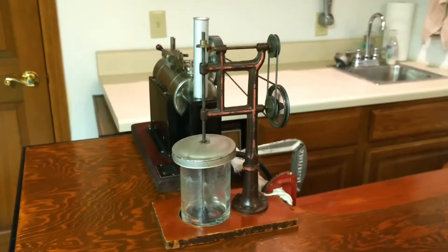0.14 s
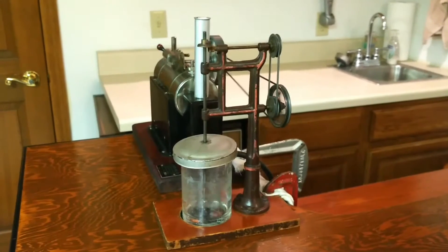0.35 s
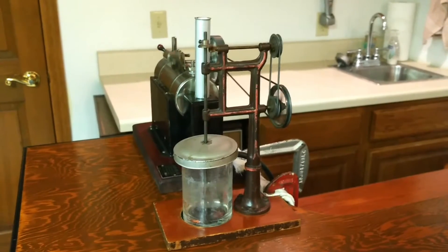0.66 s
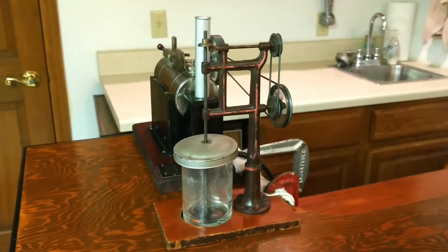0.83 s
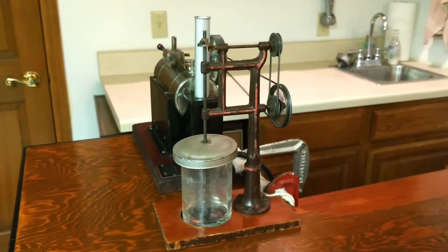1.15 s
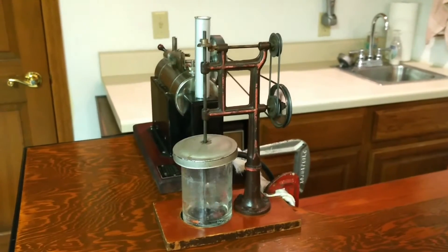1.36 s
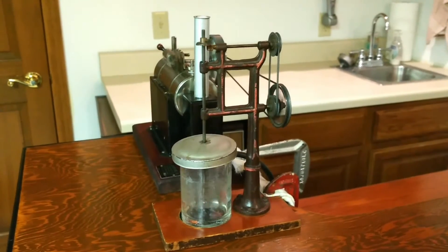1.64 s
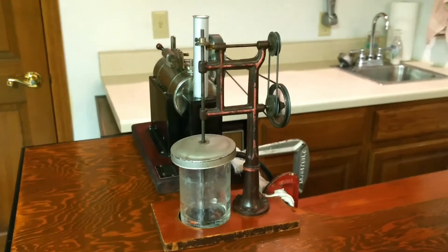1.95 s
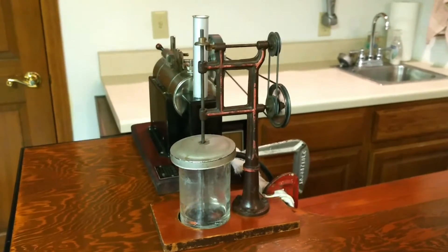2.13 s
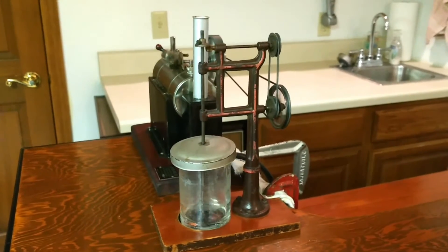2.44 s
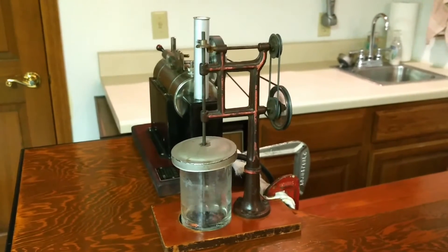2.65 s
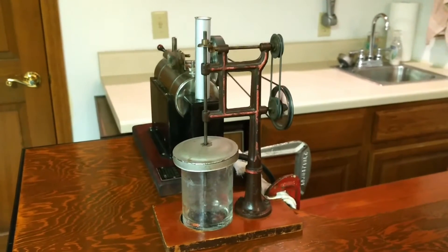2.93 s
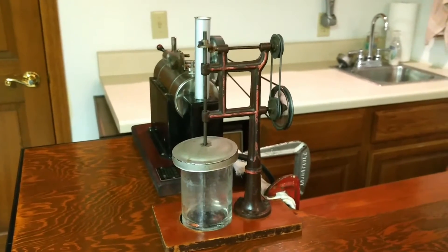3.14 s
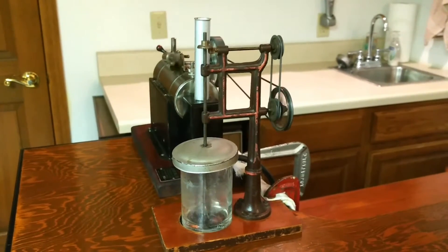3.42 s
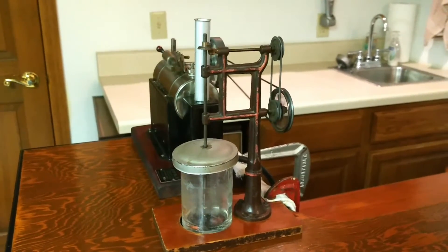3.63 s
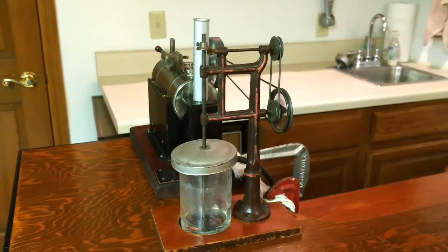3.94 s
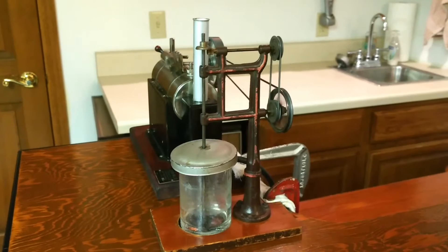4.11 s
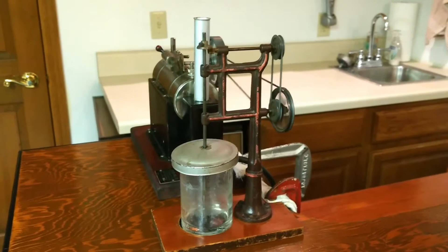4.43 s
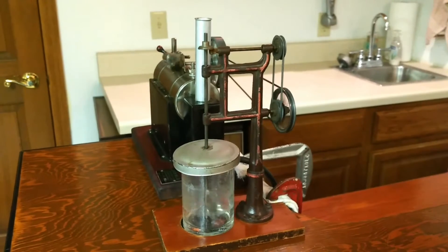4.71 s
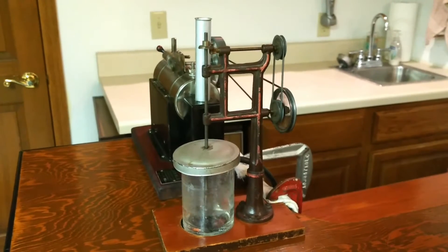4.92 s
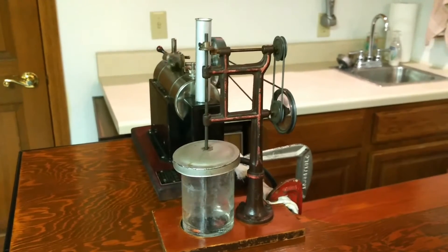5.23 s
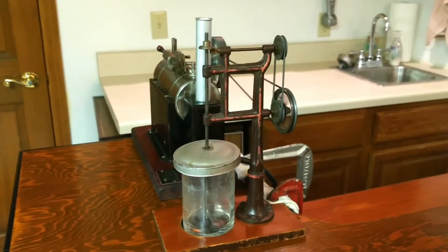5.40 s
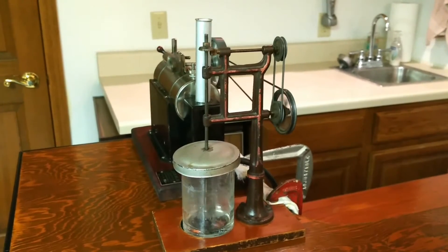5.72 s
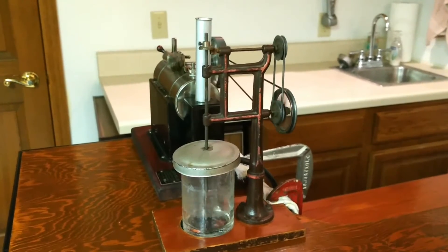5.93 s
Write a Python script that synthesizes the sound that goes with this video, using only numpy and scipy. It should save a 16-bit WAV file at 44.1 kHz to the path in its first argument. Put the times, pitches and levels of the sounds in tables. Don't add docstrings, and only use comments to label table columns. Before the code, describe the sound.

A toy steam engine drives a small churn with a fast, even double-knock clatter, soft rhythmic steam hiss and irregular glassy rattles in a kitchen.

```python
import sys
import numpy as np
from scipy import signal
from scipy.fft import rfft, irfft, next_fast_len
from scipy.io import wavfile
from scipy.ndimage import uniform_filter1d

SR = 44100
rng = np.random.default_rng(int(sys.argv[2]) if len(sys.argv) > 2 else 0)


def linear_from_db(decibels):
    return 10 ** (np.asarray(decibels, float) / 20)


def to_wav(sig):
    pcm = np.clip(np.atleast_2d(sig), -1, 1) * 32767
    pcm = np.round(pcm).astype(np.int16)
    wavfile.write(sys.argv[1], SR, pcm.T)


N = 267246
LOST_S, LOST = 4.678, 1024
LONG = N + LOST
MS = SR / 1000

# start in seconds, level in dB.
EARLY_KNOCKS = [(0.016, -29.9), (0.0934, -25.6), (0.1714, -25.0), (0.2499, -23.9), (0.3283, -27.6),
                (0.4066, -26.1), (0.4857, -30.2), (0.5636, -25.9), (0.642, -26.8), (0.7211, -30.5),
                (0.7997, -31.6), (0.8777, -25.4), (0.9564, -27.2), (1.0348, -26.3), (1.113, -26.1),
                (1.1922, -27.8), (1.272, -29.3), (1.3498, -26.3), (1.429, -31.0), (1.5079, -27.0),
                (1.5866, -27.1), (1.6656, -28.8), (1.7446, -27.1), (1.8232, -27.7), (1.9033, -28.0),
                (1.9828, -29.6), (2.0619, -28.9), (2.1413, -27.5), (2.2209, -27.5), (2.3007, -26.4),
                (2.3806, -27.3), (2.4609, -27.8), (2.5414, -26.1), (2.6207, -26.6), (2.701, -24.7),
                (2.7813, -27.3), (2.8616, -28.3), (2.9431, -26.3)]
LATE_KNOCKS = [(3.0233, -27.1), (3.1036, -27.5), (3.1845, -26.3), (3.2656, -26.7), (3.3452, -25.8),
               (3.4256, -26.1), (3.5062, -27.2), (3.5868, -26.5), (3.6666, -26.8), (3.7476, -29.2),
               (3.8277, -27.2), (3.9084, -29.4), (3.9889, -29.2), (4.07, -31.6), (4.1505, -28.4),
               (4.2319, -26.6), (4.3122, -25.9), (4.3926, -26.8), (4.4738, -26.0), (4.5554, -25.0),
               (4.6356, -25.0), (4.6932, -26.3), (4.7748, -24.8), (4.8554, -26.3), (4.9366, -25.1),
               (5.0182, -25.7), (5.0991, -29.6), (5.1804, -25.7), (5.2617, -26.3), (5.343, -26.6),
               (5.4242, -27.3), (5.5062, -25.7), (5.5876, -25.3), (5.6676, -28.0), (5.7494, -27.6),
               (5.8317, -25.5), (5.9118, -26.2), (5.9939, -26.0)]
# start in seconds, level in dB.
RATTLES = [(.031, -27), (.383, -29), (.395, -35), (0.547, -22.5), (0.758, -22), (0.767, -29), (.777, -20),
           (.826, -23), (1.207, -26), (1.2136, -23), (1.222, -24), (1.575, -29), (2.032, -22), (2.237, -25),
           (2.2452, -23), (2.269, -26), (2.6913, -26), (3.1379, -22), (3.147, -23), (3.232, -24),
           (3.3709, -17), (3.394, -25), (3.817, -25), (3.973, -27), (4.034, -28), (4.045, -20),
           (4.053, -26), (4.122, -33.5), (4.134, -21), (4.212, -28), (4.218, -24), (4.4452, -29),
           (4.5095, -21.5), (4.524, -29), (4.573, -24), (4.592, -23), (4.658, -27), (4.7171, -25.5),
           (4.7992, -24), (4.8758, -25), (5.161, -24), (5.173, -31), (5.254, -24), (5.621, -25),
           (5.783, -27), (5.802, -21), (5.868, -23), (5.875, -24), (6.014, -21), (6.0246, -25)]
# start in seconds, level in dB, pitch in Hz.
SQUEAKS = [
    (1.8656, -47, 5880),
    (3.5418, -54, 5700),
    (3.8222, -41.5, 5900),
    (3.908, -42.5, 8000),
    (4.0594, -46, 7990),
    (4.1325, -43, 5900),
    (4.2832, -42, 5770),
    (4.6654, -48, 5710),
    (5.5364, -48, 8000),
]

# pitch in Hz, level in dB, seconds to fall by 60 dB.
CRANK_RING = [(370, -10, .12), (570, -14, .04), (638, -2, .055), (742, -4, .045), (880, -10, .03),
              (1048, -6, .045), (1110, -8, .035), (1190, -5, .05), (1332, -6.5, .06), (1550, -13, .03),
              (1890, -22, .04), (2940, -24, .04)]
RETURN_RING = [(430, -14, .05), (590, -13, .035), (640, 0, .055), (745, -7, .045), (1050, -13, .04),
               (1332, -15, .05), (1640, -14, .04)]
VALVE_RING = [(1600, -5, .035), (1893, -1, .045), (2003, -4, .04)]
LINKAGE_RING = [(2440, -38, 0.0094), (2955, 28, 0.0069), (3260, -23, 0.019), (3670, -34, 0.11),
                (3910, 3.5, 0.051)]
JAR_RING = [(215.3, -7, 0.17), (271.5, 0, 0.083), (325, 2.5, 0.02), (371, -3.5, 0.15), (448, 12.5, 0.019),
            (568, -39, 0.041), (540, -29, 0.059), (685, 14, 0.025), (734, -6, 0.012), (1060, -21, 0.029),
            (1416, 17, 0.028), (2870, -31, 0.016)]
TABLE_RING = [(177, -34, 0.039), (165.5, -3, 0.23), (189, 13, 0.17), (217.7, 11.5, 0.075)]

# multiple of the shaft speed, level in dB.
ORDERS_DB = [(5, -49), (9, -48), (10, -54), (12, -55.5), (14, -52.5), (17, -62.5), (29, -56), (30, -56.5)]
# time in seconds, level change in dB.
NINTH_DRIFT = [
    (0, 2.5),
    (1.2, 1.5),
    (2.6, -2.5),
    (6.1, -2.5),
]
# frequency in Hz, level in dB per Hz.
RUMBLE = [(30, -0.5), (60, 9), (95, -54), (112, -47), (135, -9), (170, 7.5), (260, -20), (370, -5.5),
          (640, -6.5), (1000, -10), (1600, -26.5), (2200, -8.5), (3000, -21.5), (5000, -51.5)]
# pitch in Hz, width in Hz, level in dB.
STRANDS = [(167, 14, -51), (205, 14, -54), (371, 20, -55), (638, 36, -55), (740, 40, -57), (1190, 50, -64),
           (1550, 80, -66)]

# frequency in Hz, level in dB per Hz.
PUFF_COLOR = [(300, -60), (1500, -13), (3000, -0.5), (4000, -13), (6000, -8.5), (9000, -7.5), (11500, -5.5),
              (13500, -3.5), (15300, 4.5)]
# frequency in Hz, level in dB per Hz.
LEAK_COLOR = [(300, -9.5), (1500, 3.5), (3000, -4.5), (4500, -6), (7000, -7.5), (10000, -9), (12500, -10.5),
              (15300, 5)]
# time in seconds, level in dB.
PRESSURE = [
    (0, -46),
    (1.4, -48.5),
    (2.3, -46.5),
    (4.4, -47),
    (6.1, -46),
]

# time in seconds, lean from return knock (0) to chatter (1),
# valve contact from 0 to 1.
SLACK = [(0, 0.3, 0.8), (.7, 0.45, 0.77), (.95, 0.04, 0.73), (1.11, 0.7, 0.2), (1.2, 0.25, 0.87),
         (1.7, 0.46, 0.83), (2.0, 0.5, 0.78), (2.3, 0.22, 0.72), (2.55, 0.5, 0.4), (3.05, 0.8, 0.4),
         (3.3, 0.56, 0.45), (3.5, .15, 0.4), (3.67, 0.57, 0.45), (3.85, 0.28, 0.78), (4.07, 0.37, 0.76),
         (4.2, 0.69, 0.26), (5.0, 0.64, 0.1), (6.1, 0.75, 0.2)]
# delay after the knock in ms, level in dB.
REBOUNDS = [
    (6.35, -8),
    (13.1, -14),
]
# delay after the knock in ms, level in dB.
TICKS = [
    (40.5, 3),
    (46.0, 5.5),
    (52.5, -19),
]
# delay after the knock in ms, level in dB.
CHATTER = [(39.5, 3), (41.7, 7.5), (43.6, 6.5), (50.0, 4), (54, -5)]
# delay after the knock in ms, level in dB.
CLACKS = [
    (-0.5, -44),
    (0, -44.5),
    (6, -55),
    (11.5, -44),
    (24, -53.5),
]

# frequency in Hz, seconds to fall by 60 dB.
KITCHEN = [(100, 0.63), (1000, 0.091), (4000, 0.24), (15000, 0.23)]

# frequency in Hz, difference in dB.
PORT_TILT = [(100, 0), (1400, 0), (2000, 2), (2700, -3), (4000, -4), (9000, -4), (15000, -4.5)]
# frequency in Hz, share of the other port taken off.
CANCEL = [(100, .98), (2200, 0.75), (4400, 0.84), (6600, 0.53), (9000, 0.52), (11000, 0.46), (13200, 0.41),
          (15500, 0.14)]
# frequency in Hz, level in dB.
WIDTH = [(300, -0.5), (600, -4), (1100, 1.5), (1600, -0.5), (2200, -7), (3100, -7), (3500, 0.5)]
# frequency in Hz, difference in dB.
BASS_TILT = [(40, 6), (110, 2.5), (170, -1), (300, -2), (500, 0.8), (1000, 0)]
OFFSET = [
    [.0078],
    [-.0003],
]
BANDS = [44, 48, 56, 64, 72, 80, 88, 96, 108, 120, 132, 144, 160, 176, 196, 216, 240, 264, 292, *range(320, 770, 32)]
APART_S = [.739, 1.018, 1.204, 1.691, 1.923, 2.016, 2.086, 2.968, 3.038, 3.363, 3.502, 4.176, 4.501, 4.571,
           4.687, 4.71, 5.081, 5.615, 5.848]
# frequency in Hz, limit in dB.
STARVE = [(1000, -20), (2200, -11), (3300, -10), (5000, -9), (7500, -6), (8600, -4), (9300, -2),
          (10000, -6), (10800, -3.8), (13500, -7.5), (15500, -12)]
# frequency in Hz, level in dB.
ROUNDING = [(1000, -22), (3000, -12), (5000, -9.5), (16000, -9.5)]


def evened(x):
    return x / np.sqrt(np.mean(x ** 2) + 1e-20)


def read(points, hz):
    f, value = np.transpose(points)
    return np.interp(np.log(hz + 1), np.log(f + 1), value)


def shaped(x, gain):
    size = next_fast_len(x.shape[-1] + 4096)
    return irfft(rfft(x, size) * gain(np.fft.rfftfreq(size, 1 / SR)), size)[..., :x.shape[-1]]


def colored(x, table):
    return evened(shaped(x, lambda f: linear_from_db(read(table, f))))


def unbroken(s):
    s = np.asarray(s)
    return s * SR + LOST * (s > LOST_S)


def clicks(at, db):
    train, at = np.zeros(LONG), np.round(at).astype(int)
    keep = (at >= 0) & (at < LONG)
    np.add.at(train, at[keep], (linear_from_db(db) * np.ones(len(at)))[keep])
    return train


def ring(train, modes, blow_db=0., blow_hz=1000.):
    t = np.arange(6000) / SR
    body = sum(linear_from_db(db - 60 * t / t60) * np.sin(2 * np.pi * hz * t) for hz, db, t60 in modes)
    blow = np.sin(2 * np.pi * blow_hz * t) * (t < 1 / blow_hz)
    sound = -(body / abs(body).max() + linear_from_db(blow_db) * blow)
    contact = np.hanning(round(.5 * SR / blow_hz) + 2)
    sound = np.convolve(sound, contact)
    return signal.oaconvolve(train, sound / abs(sound).max())[:LONG]


def slow(rate_hz, count):
    steps = rng.standard_normal((count, LONG // 256 + 2))
    steps = shaped(steps, lambda f: np.exp(-(f / 256 / rate_hz) ** 2))
    places = np.arange(LONG) / 256
    return np.array([np.interp(places, np.arange(len(row)), evened(row)) for row in steps])


def turns_at():
    return unbroken(np.transpose(EARLY_KNOCKS + LATE_KNOCKS)[0])


def per_turn(table):
    s, *columns = np.transpose(table)
    return [np.interp(turns_at(), unbroken(s), column) for column in columns]


def crank_turns():
    at = turns_at()
    at = np.r_[2 * at[0] - at[1], at, 2 * at[-1] - at[-2]]
    return np.interp(np.arange(LONG), at, np.arange(len(at)) - 1.)


def hum():
    peak_turn, waver_db = .55, .6
    turns, waver = crank_turns(), slow(0.93, count=len(ORDERS_DB))
    drift_db = np.interp(np.arange(LONG) / SR, *np.transpose(NINTH_DRIFT))
    lines = np.zeros(LONG)
    for k, ((order, db), w) in enumerate(zip(ORDERS_DB, waver)):
        level = linear_from_db(db + waver_db * w + drift_db * (k == 1))
        phase = 2 * np.pi * round(order) * (turns - peak_turn) + 0.063 * order * w
        lines += level * np.cos(phase)
    return np.sqrt(2) * lines + linear_from_db(-42) * colored(rng.standard_normal(LONG), RUMBLE)


def strands():
    swell_db = 2.5
    drive, swell = rng.standard_normal((len(STRANDS), LONG)), slow(1.8, count=len(STRANDS))
    out = np.zeros(LONG)
    for (hz, width, db), x, w in zip(STRANDS, drive, swell):
        tone = evened(shaped(x, lambda f: 1 / (1 + (2 * (f - hz) / width) ** 2)))
        out += linear_from_db(db + swell_db * w) * tone
    return out


def steam():
    puff_play_db, seal_db = 1.4, -3.5
    spit_turn, spit_width, spit_db, spit_low_hz = .155, .025, -49, 10000
    turns, (puff_db,) = crank_turns(), per_turn(PRESSURE)
    puff_db = puff_db + puff_play_db * rng.standard_normal(len(puff_db))
    part = turns % 1
    puff_db = puff_db[np.clip(turns.astype(int), 0, len(puff_db) - 1)]
    opening = np.clip((part - .225) / 0.12, 0, 1) * np.clip((.88 - part) / 0.32, 0, 1)
    flutter = linear_from_db(0.14 * slow(70., count=1)[0] + 1.36 * slow(27.0, count=1)[0])
    puff, leak = rng.standard_normal((2, 2, LONG))
    puff = opening * linear_from_db(puff_db + 5.0) * flutter * colored(puff, PUFF_COLOR)
    thin = rng.standard_normal((2, LONG))
    thin = evened(shaped(thin, lambda f: linear_from_db(read(PUFF_COLOR, f)) / (1 + (spit_low_hz / (f + 1)) ** 6)))
    spit = np.exp(-((part - spit_turn) / spit_width) ** 2)
    snap = linear_from_db(11) * np.exp(-((part - .315) / 0.011) ** 2)
    jets = linear_from_db(spit_db) * (spit + snap)
    fading = linear_from_db(seal_db * ((part - .3) % 1) ** 3)
    return puff + jets * flutter * thin + linear_from_db(-45.0) * fading * colored(leak, LEAK_COLOR)


def churn_patter():
    hits = (rng.random(LONG) < 260 / SR) * linear_from_db(1.9 * np.minimum(rng.exponential(1, LONG), 4))
    place = rng.integers(0, 3, LONG)
    patter = np.zeros(LONG)
    for k in range(3):
        modes = [(hz * rng.uniform(0.92, 1.015), db + 4 * rng.standard_normal(), t60)
                 for hz, db, t60 in JAR_RING]
        patter += ring(hits * (place == k), modes, -9.0, 630.0)
    return linear_from_db(-46.0) * evened(patter)


def levels():
    lean_play, contact_play = .13, .3
    lean, contact = per_turn(SLACK)
    play = rng.standard_normal((len(lean), 4))
    lean = np.clip(lean + lean_play * play[:, 0], 0, 1)
    looseness = 1 - np.clip(contact, 0, 1)
    contact = np.clip(contact + contact_play * looseness * play[:, 1], 0, 1)
    knock_db = np.transpose(EARLY_KNOCKS + LATE_KNOCKS)[1]
    return_db = -28.5 - 12.5 * lean
    tick_db = -53.5 + 21 * contact
    chatter_db = -54.5 + 15.5 * lean
    return knock_db, return_db, tick_db, chatter_db


def delayed(at, table, db, late_play, db_play):
    return sum(clicks(at + (late + late_play[:, k]) * MS, db + more_db + db_play[:, k])
               for k, (late, more_db) in enumerate(table))


def loose_bearings(knock, back):
    t = np.arange(1200)
    trail = np.exp(-t / (6 * MS)) * (t > 1.5 * MS)
    spray = rng.uniform(-1, 1, LONG) * (rng.random(LONG) < 2500 / SR)
    strength = signal.oaconvolve(linear_from_db(-6) * knock + linear_from_db(-5) * back, trail)[:LONG]
    return ring(spray * strength, CRANK_RING, -8., 1050.)


def knocks(at, knock_db, return_db, play):
    knock = clicks(at - .48 * MS, knock_db + 6.0)
    bounce = clicks(at + (4.1 + .08 * play[:, 2]) * MS, knock_db - 3 + .6 * play[:, 0])
    back = clicks(at + (40.5 + .5 * play[:, 1]) * MS, return_db + 4.5)
    back = back + clicks(at + (45.19 + .5 * play[:, 1]) * MS, return_db + 2)
    pin = delayed(at, REBOUNDS, knock_db + 3.5, .1 * play[:, 5:], .8 * play[:, 7:])
    blows = ring(knock, CRANK_RING, -4.5, 953.0) + ring(pin, CRANK_RING[4:10], -0.76, 1600.0)
    blows = signal.lfilter(*signal.butter(1, 340, "high", fs=SR), blows)
    returns = ring(bounce, RETURN_RING, -0.65, 876.0) + ring(back, RETURN_RING, -8, 705.0)
    return blows + returns + linear_from_db(-1.5) * loose_bearings(knock, back)


def valve_and_linkage(at, tick_db, chatter_db, play):
    still = 0 * play
    tick = delayed(at, TICKS, tick_db, .5 * play[:, 3:], still)
    chatter = delayed(at, CHATTER, chatter_db, .83 * play[:, 4:], 2.9 * play)
    chatter = chatter + delayed(at, CLACKS, 0, still, 2.4 * play[:, 1:])
    return ring(tick, VALVE_RING, -25., 1900.) + ring(chatter, LINKAGE_RING, -22., 3000.)


def table_thump(at, play):
    push = clicks(at + 1.47 * MS, -36 + 0.59 * play[:, 0])
    push = push + clicks(at + 51 * MS, -38 + 3.9 * play[:, 1])
    push = push + clicks(at + 69 * MS, -37 + 0.5 * play[:, 2])
    return ring(push, TABLE_RING, -50.0, 132.0)


def strokes():
    at = turns_at()
    knock_db, return_db, tick_db, chatter_db = levels()
    play = rng.standard_normal((len(at), 9))
    wood = knocks(at, knock_db, return_db, play)
    metal = valve_and_linkage(at, tick_db, chatter_db, play)
    return wood, metal, table_thump(at, play)


def churn_taps():
    s, db = np.transpose(RATTLES)
    chance = np.linspace(3, 6, LONG) / SR
    stray = rng.random(LONG) < chance
    stray_db = -34 + 3 * rng.standard_normal(LONG).clip(-2, 1)
    taps = clicks(unbroken(s) - 30, db - 4) + stray * linear_from_db(stray_db)
    return -ring(taps, JAR_RING, 1.1, 616.0)


def squeaks():
    rise_s = 0.0073
    out, t = np.zeros(LONG), np.arange(800) / SR
    for s, db, hz in SQUEAKS:
        at = int(unbroken(s))
        rough = uniform_filter1d(rng.standard_normal(800), 30)
        wobble = np.cumsum(hz + 900 * rough) / SR
        swell = t / rise_s * np.exp(1 - t / rise_s) ** 2
        out[at:at + 800] += linear_from_db(db - 9) * swell * np.sin(2 * np.pi * wobble)
    return out


def kitchen(x):
    taps = np.zeros((2, SR // 2))
    at = np.arange(120, SR // 2 - 20, 20) + rng.integers(0, 20, (2, (SR // 2 - 121) // 20))
    np.put_along_axis(taps, at, rng.choice([-1., 1.], at.shape), 1)
    hz, t, z = signal.stft(taps, SR, nperseg=256)
    fading = linear_from_db(-60 * t / read(KITCHEN, hz)[:, None])
    tail = signal.istft(z * fading, SR, nperseg=256)[1]
    return signal.fftconvolve(x[None], tail / np.linalg.norm(tail[0]), axes=1)[:, :LONG]


def ports(direct, lead, apart):
    left = shaped(direct, lambda f: np.exp(1j * np.pi * f * lead / SR))
    right = shaped(direct, lambda f: np.exp(-1j * np.pi * f * lead / SR))
    apart = shaped(apart, lambda f: np.minimum(f / 2300, 1))
    return np.array([left + apart, right - apart])


def scene():
    wood, metal, thump = strokes()
    rattle = churn_taps() + churn_patter()
    low, hiss = hum() + thump + strands(), steam()
    wet = linear_from_db(-9.0) * kitchen(wood + rattle + linear_from_db(2.5) * metal)
    both = ports(wood + rattle + wet[0], lead=-0.46, apart=linear_from_db(12.0) * wet[1])
    both += ports(metal + squeaks(), lead=1.0, apart=0 * metal)
    both += ports(low, lead=4.3, apart=linear_from_db(-2.0) * kitchen(low)[1])
    both += ports(hiss[0], lead=0, apart=hiss[1])
    dip_hz, dip_width_hz, dip_db = 472, 12.7, -2
    both = shaped(both, lambda f: linear_from_db(dip_db * np.exp(-((f - dip_hz) / dip_width_hz) ** 2)))
    cut = round(LOST_S * SR)
    return np.c_[both[:, :cut], both[:, cut + LOST:]]


def tilted(pair, gain, table):
    return np.array([shaped(side, lambda f: gain(f) * linear_from_db(sign * read(table, f) / 2))
                     for side, sign in zip(pair, (1, -1))])


def steer(pair):
    delay = 20
    late = lambda f: read(CANCEL, f) * np.exp(-2j * np.pi * f * delay / SR)
    lift = lambda f: np.where(f < SR / delay / 2, 1 / (1 - late(f)), .5)
    pair = tilted(pair, lambda f: 1, PORT_TILT)
    steered = pair - shaped(pair[::-1], late)
    difference = steered - steered[::-1]
    steered = steered + shaped(difference, lambda f: (linear_from_db(read(WIDTH, f)) - 1) / 2)
    return tilted(steered, lift, BASS_TILT)


def starve(x):
    grid = 166
    pair = np.pad([x[0] + x[1], x[0] - x[1]], ((0, 0), (grid, 0)))
    window = np.sin(np.pi * (np.arange(2048) + .5) / 2048)
    block = dict(window=window, nperseg=2048, noverlap=1024)
    z = signal.stft(pair, **block)[2]
    joint = np.ones(z.shape[2], bool)
    joint[np.round((np.array(APART_S) * SR + grid) / 1024).astype(int)] = False
    for lo, hi in zip(BANDS, BANDS[1:]):
        size = np.sqrt((abs(z[:, lo:hi]) ** 2).sum(axis=1))
        limit_db = read(STARVE, (lo + hi) * SR / 4096)
        limit_db = limit_db + 1.5 * uniform_filter1d(rng.standard_normal(len(joint)), 2)
        empty = joint & (size < size[::-1] * linear_from_db(limit_db))
        z[:, lo:hi] *= ~empty[:, None]
        grain = np.exp(2j * np.pi * rng.random(z[:, lo:hi].shape))
        error = size.max(axis=0) / np.sqrt(hi - lo) * linear_from_db(read(ROUNDING, lo * SR / 2048))
        z[:, lo:hi] += ~joint * grain * error
    both, differ = signal.istft(z, **block)[1][:, grid:grid + N]
    return np.array([both + differ, both - differ]) / 2


def band_edges(f):
    top = linear_from_db(-np.clip((f - 15450) / 7.5, 0, 80))
    bottom = np.sqrt(1 / (1 + (104 / (f + 1)) ** 14) + linear_from_db(-27) ** 2)
    return top * bottom


def roll_off(x):
    return signal.sosfilt(signal.butter(12, 16690, fs=SR, output="sos"), x)


def record(dry):
    x = shaped(starve(steer(dry)), band_edges) + OFFSET
    jolt_db, jolt_s = -41, .004
    x = x + linear_from_db(jolt_db) * np.exp(-((np.arange(N) / SR - LOST_S) / jolt_s) ** 2)
    return roll_off(x)


dry = scene()
out = record(dry)
to_wav(out)
```